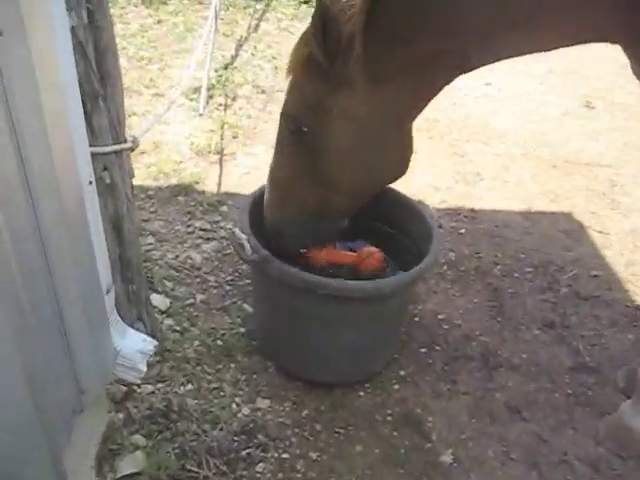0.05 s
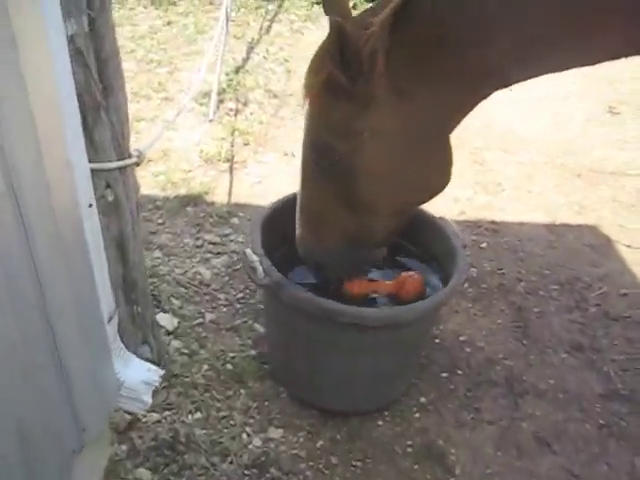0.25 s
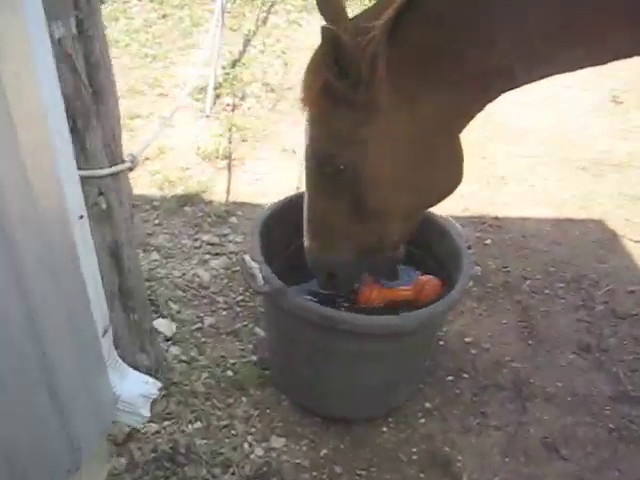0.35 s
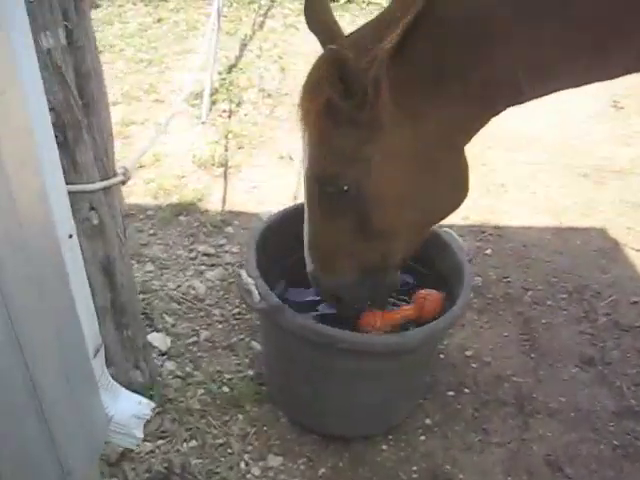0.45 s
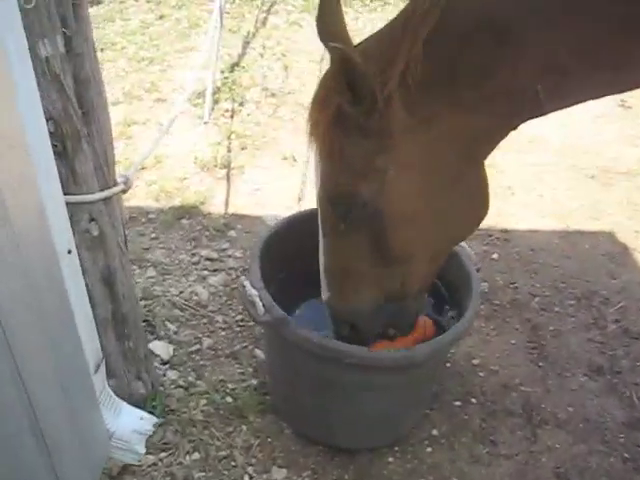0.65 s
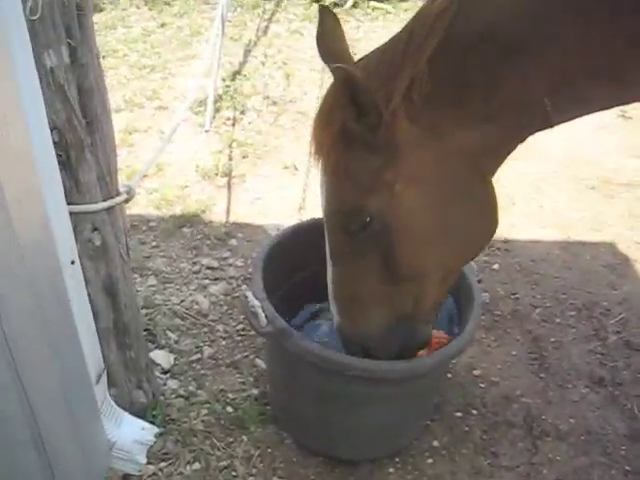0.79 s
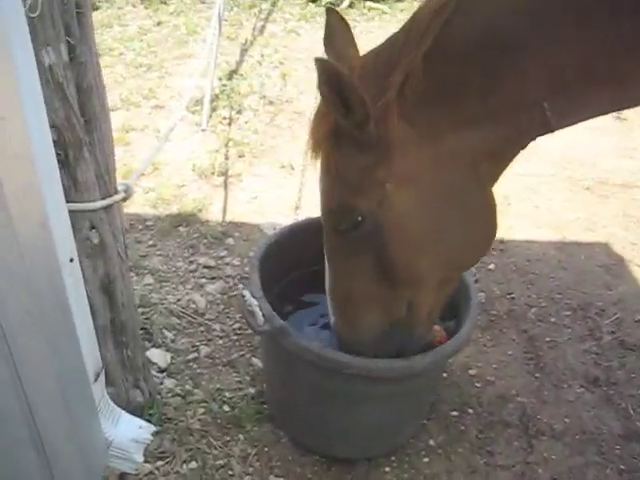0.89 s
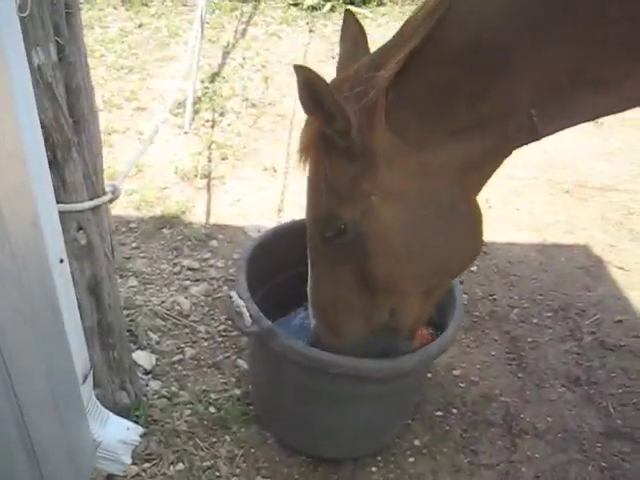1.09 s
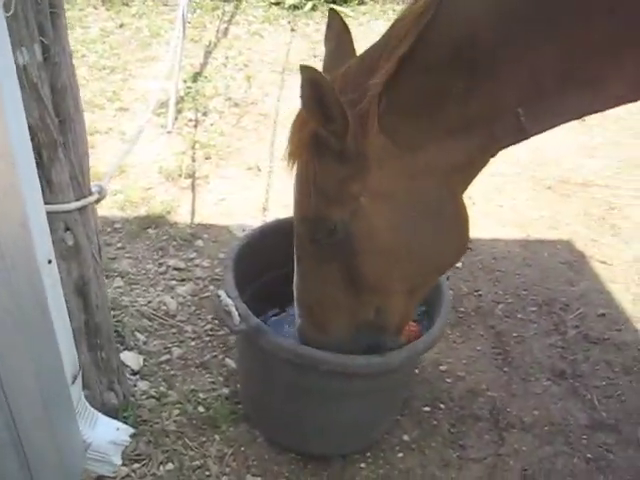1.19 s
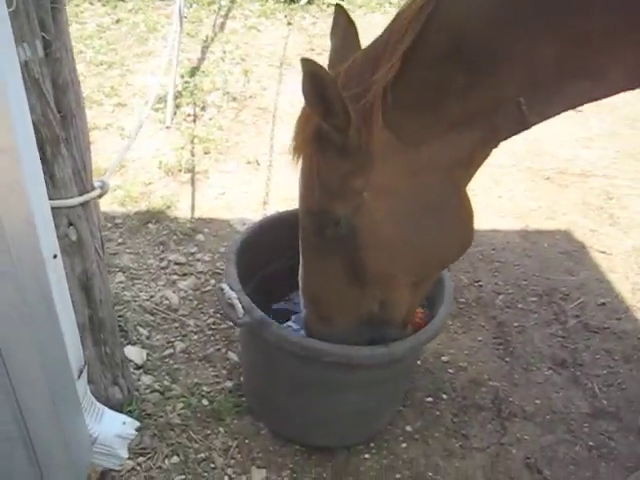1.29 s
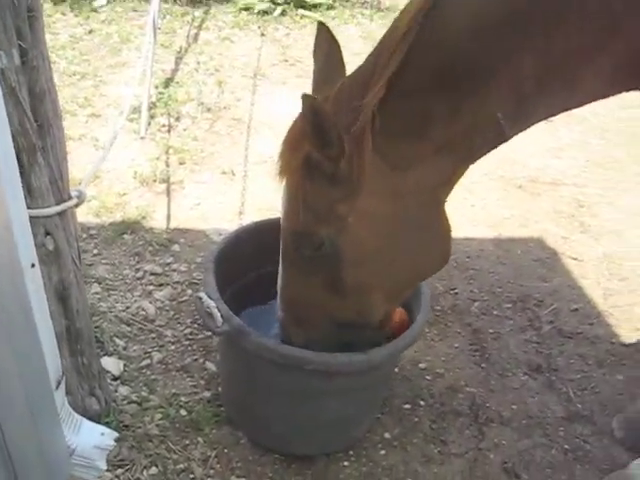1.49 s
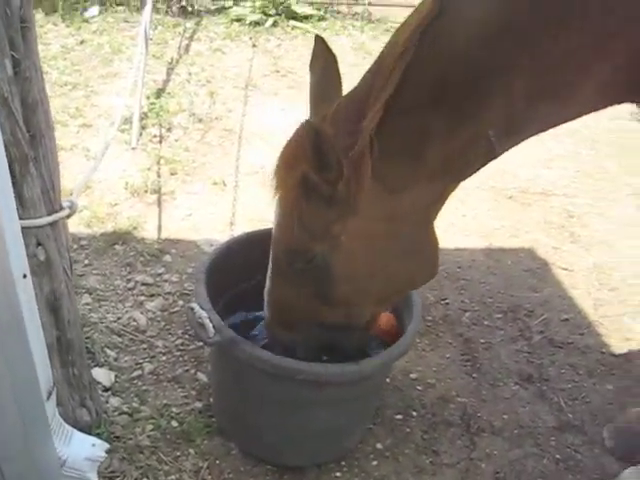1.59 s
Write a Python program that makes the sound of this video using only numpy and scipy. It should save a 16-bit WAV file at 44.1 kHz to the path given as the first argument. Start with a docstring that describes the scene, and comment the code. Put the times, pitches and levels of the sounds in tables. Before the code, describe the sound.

Water sloshes in a plastic tub as a horse's muzzle smacks wetly and bumps a toy against the wall. The biggest splash and knock come midway, then the splashing thins as wind rumbles on the microphone outdoors.

```python
"""Outdoors, heard across a quiet yard with a faint high whine: a horse at a plastic tub of water.
Its muzzle starts with small sloshes, dotted with wet smacks and bubbles, and pushes a toy that knocks
on the wall; the hollow tub rings and echoes. Just past halfway come the biggest slosh and knock.
The splashing then thins out while wind rises on the microphone, ending in one low puff."""
import sys
import numpy as np
from scipy import signal
from scipy.fft import rfft, irfft
from scipy.io import wavfile
from scipy.ndimage import uniform_filter1d

SR = 44100
rng = np.random.default_rng(int(sys.argv[2]) if len(sys.argv) > 2 else 0)


def generate_wav(sig):
    """Save sig (samples, or channels by samples) to the path in sys.argv[1] as 16-bit PCM at SR."""
    pcm = np.round(np.clip(np.atleast_2d(sig).T, -1, 1) * 32767).astype(np.int16)
    wavfile.write(sys.argv[1], SR, pcm)


N = 72765
T = np.arange(N) / SR

# pushes of the muzzle (crest time [s], rise [s], fall [s], gulp [dB], wash [dB], spray [dB])
MUZZLE_PUSHES = [(0.097, 0.01, 0.011, -56, -48, -75), (0.221, 0.015, 0.028, -48, -38, -38),
                 (0.289, 0.016, 0.022, -47, -42.5, -56), (0.341, 0.024, 0.024, -45.5, -40, -46.5),
                 (.425, .03, 0.12, -56, -50.5, -56), (.508, 0.019, 0.022, -43, -42, -44),
                 (0.592, 0.0071, 0.0085, -49, -46, -49.5), (.69, 0.02, 0.013, -74, -55.5, -48.5),
                 (.785, 0.017, 0.089, -56, -51.5, -49), (.831, 0.0057, 0.028, -39.5, -40.5, -41.5),
                 (0.869, 0.025, 0.021, -32, -38, -33.5), (0.891, 0.0086, 0.021, -41, -33, -32),
                 (.925, .01, 0.016, -52, -44, -47), (0.983, 0.011, 0.004, -48, -46, -59),
                 (1.101, 0.014, 0.023, -59, -47.5, -47), (1.133, 0.012, 0.021, -52, -40.5, -50.5),
                 (1.228, 0.0089, 0.014, -50, -47.5, -55), (1.288, 0.0064, 0.042, -54.5, -51, -54),
                 (1.383, 0.015, 0.01, -50, -40, -42)]
# spectra of a slosh's low gulp, middle wash and high spray (frequency [Hz], relative level [dB])
GULP_SPECTRUM = [(60, -25), (140, -11), (220, -7), (310, 0), (500, -1), (700, -11), (1200, -35)]
WASH_SPECTRUM = [(400, -28), (690, -13), (920, -3), (1200, -2.5), (1500, -3.5), (2000, -11), (2800, -22.5),
                 (5000, -39)]
SPRAY_SPECTRUM = [(1200, -40.5), (2300, 3.5), (3300, 5), (4600, -1.5), (6300, 1), (8500, -6), (12000, -8),
                  (16000, -29)]
# wet smacks (time [s], level [dB], centre [Hz], width [Hz], decay [s], relative snap level [dB])
LIP_SMACKS = [(.059, -31.5, 3080, 1400, 0.0096, -20), (0.2195, -29.5, 5150, 3400, .002, -6),
              (0.2662, -12.5, 6200, 6000, 0.00085, -20), (0.2671, -15.5, 8100, 10000, 0.0012, -3),
              (0.2713, -21.5, 5930, 6040, 0.0031, -20), (0.2741, -11.5, 4280, 5000, 0.0023, -2.5),
              (0.3917, -22, 2240, 3320, 0.0022, -7), (.4535, -2.5, 4000, 3200, 0.000067, -14),
              (.4547, -11.5, 6340, 3000, 0.0015, -17), (.455, -15, 1790, 1410, 0.0025, -23),
              (.459, -21.5, 3400, 2580, 0.0073, -10), (.5055, -24.5, 3420, 2600, 0.0037, -6.5),
              (0.6468, -24.5, 1900, 3380, 0.0016, -9), (.674, -23.5, 3570, 2620, 0.0048, -15),
              (0.6878, -27.5, 5860, 5700, 0.0046, -11), (0.7501, -18, 5600, 2440, 0.0055, -15),
              (.772, -31.5, 5840, 5900, 0.0037, -11), (0.8149, -16, 4550, 3940, 0.0012, -6),
              (0.8371, -19.5, 6900, 4200, 0.0062, 2), (0.8754, -19, 4930, 4600, 0.0053, 0),
              (1.145, -8, 9770, 4230, 0.0002, -13), (1.1441, -13, 4500, 3120, 0.0038, -19),
              (1.256, -32, 3920, 1210, 0.007, -18), (1.3024, -23, 3170, 2760, 0.0032, -16),
              (1.3628, -25, 5700, 3000, 0.0025, -16), (1.378, -27, 3600, 4000, 0.00099, -12),
              (1.383, -23, 2960, 3000, 0.0017, -14), (1.485, -27, 5030, 2540, 0.0019, -2.5),
              (1.524, -28, 4070, 3040, 0.0038, -16), (1.541, -33, 6000, 2460, 0.0051, -16),
              (1.6225, -28, 3360, 1780, 0.0058, -5)]
# spectrum of a smack's bright snap (frequency [Hz], relative level [dB])
SNAP_SPECTRUM = [(300, -41), (1000, -39), (5000, -3), (7500, -0.5), (9500, 1), (12000, -4), (14300, -2),
                 (15400, -6)]
# toy and muzzle hitting the tub (time [s], level [dB], centre [Hz])
WALL_KNOCKS = [(.2125, -28.5, 860), (0.2226, -30, 980), (0.2663, -24, 1360), (0.274, -23.5, 1120),
               (0.341, -49, 900), (0.391, -37, 1070), (0.456, -29, 1060), (0.4972, -28, 1060),
               (0.7605, -34, 910), (0.768, -32.5, 430), (.8675, -18, 1190), (0.877, -31.5, 415),
               (0.8826, -32, 1100), (.909, -21, 1250), (0.943, -36, 1290), (.967, -40, 1040),
               (1.1448, -20, 1380), (1.379, -35, 1110)]
# bubbles, deep gulps to small drips (time [s], pitch [Hz], level [dB], life [s], glide [octaves/s])
BUBBLE_TONES = [(0.0566, 2780, -34.5, 0.0016, 8), (0.0614, 3025, -37, 0.0036, 2),
                (.215, 364, -45, 0.036, 4), (.275, 310, -38.5, 0.009, 4), (0.3915, 1320, -23.5, 0.0017, 1),
                (0.455, 3430, -19, 0.0022, -1), (0.5002, 362, -32, 0.01, 7.5),
                (.6737, 2970, -31.5, 0.0043, 2), (0.6757, 4070, -33.5, .003, 1),
                (0.7044, 2210, -34.5, 0.0026, -25), (0.7502, 4090, -22, 0.0052, 16),
                (0.7497, 6110, -22, 0.0039, -5), (0.7596, 1110, -29, 0.0038, -10),
                (0.8142, 1840, -19.5, 0.0028, 10), (0.855, 198, -32.5, 0.012, 15),
                (.856, 356.6, -29.5, 0.029, 0), (0.8587, 1320, -22.5, 0.0037, 4),
                (0.8609, 471, -24, 0.0055, 5), (.857, 770, -32.5, 0.028, 0),
                (0.8768, 3240, -26, 0.0053, 3.5), (.882, 1180, -17, 0.004, 2), (0.896, 329, -29.5, 0.01, 7),
                (0.9075, 1420, -26.5, 0.0042, -5), (1.1306, 2680, -36, 0.0034, 28),
                (1.2177, 1900, -42, 0.008, -1), (1.258, 4070, -29.5, 0.0033, 14),
                (1.2748, 2145, -31, 0.0039, -37), (1.2823, 1440, -34, 0.0017, 0),
                (1.3024, 3450, -30, 0.0038, 5), (1.378, 1085, -29.5, 0.0032, 3),
                (1.5235, 3100, -37.5, .005, -20), (1.6222, 2910, -41, 0.0074, 9)]
# resonances of the tub's hollow and wall (frequency [Hz], relative level [dB], t60 [s])
TUB_MODES = [(240, -7, .09), (304, -1, .11), (357, -1, .11), (484, 0, .1), (550, -9, .07), (770, 1, .1),
             (925, -5, .07), (1006, -2, .08), (1150, 2, .08), (1218, 2, .09), (1328, 1, .09),
             (1400, -2, .08), (1503, -4, .07), (1700, -7, .06)]
# first reflections inside the tub (delay [s], gain [ratio])
WALL_REFLECTIONS = [(.0011, 0.13), (.0029, 0.078), (.0053, .08)]
# spectra of the yard's hiss and of wind on the microphone (frequency [Hz], relative level [dB])
YARD_SPECTRUM = [(25, -27), (60, -25), (90, -1.5), (120, 0), (170, -4), (300, -4), (650, -1), (1100, -1.5),
                 (1800, -2.5), (3500, -6), (6000, -11.5), (11000, -16.5), (14300, -12), (16000, -30)]
WIND_SPECTRUM = [(20, -7), (45, 15.5), (85, 5.5), (130, -10), (220, -7), (600, -30)]
# the gust rising at the microphone (time [s], level [dB])
GUST_LEVELS = [(0, -74), (1.2, -70), (1.42, -59), (1.46, -56), (1.51, -61.5), (1.615, -53.5), (1.65, -47)]
# the whine's two close tones (frequency [Hz], level [dB])
WHINE_TONES = [(15120, -71), (15150, -68)]

TOP_HZ = 15750


def sloshes():
    """Each push of the muzzle swells and dies: a gulp and a wash ring in the tub, with spray on top."""
    power = np.zeros((3, N))
    for crest, rise, fall, *levels_db in MUZZLE_PUSHES:
        swell = np.exp(-np.maximum((crest - T) / rise, (T - crest) / fall) ** 1.18)
        power += (amp(levels_db)[:, None] * swell) ** 2
    gulp, wash, spray = (through(unit(droplets()) * np.sqrt(layer), colour(spectrum))
                         for layer, spectrum in zip(power, (GULP_SPECTRUM, WASH_SPECTRUM, SPRAY_SPECTRUM)))
    return tub_ring(gulp, share=0.024) + tub_ring(wash, share=0.084) + spray


def droplets(per_second=3500, spread_db=3):
    """A dense stream of tiny impacts of uneven size."""
    size = amp(spread_db * np.minimum(rng.exponential(size=N), 3))
    sign = rng.choice([-1, 1], N)
    return size * sign * (rng.random(N) < per_second / SR)


def smacks():
    """Water films break at the lips: a click with a resonance and a bright snap."""
    body, snap = np.zeros(N), np.zeros(N)
    for start, db, hz, width_hz, decay_s, snap_db in LIP_SMACKS:
        click = amp(db) * burst(decay_s, rough=0.28)
        add(body, start, band(click, hz, width_hz) * np.sqrt(SR / 2 / width_hz))
        add(snap, start, amp(snap_db) * click)
    return body + through(snap, colour(SNAP_SPECTRUM))


def knocks():
    """Dull, rattling blows of toy and muzzle set the tub ringing."""
    out = np.zeros(N)
    for start, db, hz in WALL_KNOCKS:
        blow = band(burst(decay_s=0.0026, rough=0.098), hz, width_hz=0.89 * hz)
        add(out, start, amp(db) * blow / np.abs(blow).max())
    return tub_ring(out, share=0.22)


def bubbles(rise_s=0.00019, wobble_depth=0.021):
    """Each bubble rings as a gliding, wobbling tone that ends as it bursts."""
    out, t = np.zeros(N), T[:SR // 8]
    for start, hz, db, life, glide in BUBBLE_TONES:
        wobble = 1 + wobble_depth * unit(uniform_filter1d(rng.standard_normal(len(t)), size=40))
        phase = 2 * np.pi * np.cumsum(hz * wobble * 2 ** (glide * t)) / SR
        envelope = np.exp(-(t / life) ** 2) * (1 - np.exp(-t / rise_s))
        add(out, start, amp(db) * np.sin(phase) * envelope)
    return out


def fizz(db=-44, centre_hz=4300, spread_octaves=0.9, decay_cycles=4):
    """Tiny stray bubbles pop on the water all along."""
    out, t = np.zeros(N), T[:SR // 20]
    for when, pitch in rng.uniform(-1, 1, size=(60, 2)):
        hz = centre_hz * 2 ** (spread_octaves * pitch)
        ring = np.sin(2 * np.pi * hz * t) * np.exp(-hz * t / decay_cycles)
        add(out, (when + 1) / 2 * T[-1], amp(db) * ring)
    return out


def tub_ring(x, share):
    """A sound blended with the ringing it raises in the tub's hollow and wall."""
    t = T[:SR // 4]
    ring = sum(amp(db) * fade(t60) * np.cos(2 * np.pi * hz * t) for hz, db, t60 in TUB_MODES)
    ring = 4 * ring / np.abs(rfft(ring)).max()
    return (x + share * signal.oaconvolve(x, ring)[:N]) / (1 + share)


def echoes(x, tub_db=-11.5, tub_t60=0.046, yard_db=-21.5, yard_t60=0.25):
    """The microphone gets the direct sound, wall reflections, the tub's short tail and the yard's echo."""
    out = x.copy()
    for delay, gain in WALL_REFLECTIONS:
        add(out, delay, gain * x)
    for db, t60 in ((tub_db, tub_t60), (yard_db, yard_t60)):
        decay = fade(t60)
        tail = uniform_filter1d(rng.standard_normal(len(decay)), size=4) * decay
        out += amp(db) * through(x, tail)
    return out


def wind():
    """A rising gust buffets the microphone with a low rumble."""
    gust = amp(np.interp(T, *np.array(GUST_LEVELS).T))
    return gust * noise(WIND_SPECTRUM)


def puff(time_s=1.637, hz=99, db=-30, width_s=0.0062):
    """One eddy of wind bumps the microphone."""
    t = T - time_s
    return -amp(db) * np.sin(2 * np.pi * hz * t) * np.exp(-(t / width_s) ** 2)


def yard(db=-49):
    """The steady outdoor hiss of the place."""
    return amp(db) * noise(YARD_SPECTRUM)


def whine():
    """A thin, faint whine flutters as its two close tones beat."""
    return sum(amp(db) * unit(np.sin(2 * np.pi * hz * T)) for hz, db in WHINE_TONES)


def amp(db):
    """Decibels to gain."""
    return 10 ** (np.asarray(db) / 20)


def unit(x):
    """Scale to rms 1."""
    return x / np.sqrt(np.mean(x ** 2))


def fade(t60):
    """A quarter second of exponential decay, 60 dB down after t60 seconds."""
    return amp(-60 * T[:SR // 4] / t60)


def burst(decay_s, rough):
    """A click followed by a quickly dying spatter."""
    t = T[:SR // 8]
    x = rough * rng.standard_normal(len(t)) * np.exp(-t / decay_s)
    x[0] = 1
    return x


def noise(spectrum):
    """Steady noise of the given spectrum, at rms 1."""
    return unit(through(rng.standard_normal(N), colour(spectrum)))


def through(x, response):
    """Pass a sound through an impulse response scaled to unit energy."""
    return signal.oaconvolve(x, response / np.linalg.norm(response))[:N]


def colour(spectrum, size=4096):
    """Minimum-phase impulse response of a (frequency [Hz], level [dB]) curve."""
    hz, db = np.array(spectrum).T
    bin_hz = np.fft.rfftfreq(size, 1 / SR) + 1
    gain = amp(np.interp(np.log(bin_hz), np.log(hz), db))
    cepstrum = irfft(np.log(gain))
    cepstrum[1:size // 2] *= 2
    cepstrum[size // 2 + 1:] = 0
    return irfft(np.exp(rfft(cepstrum)))


def band(x, hz, width_hz):
    """Band-pass around hz, reaching no higher than TOP_HZ."""
    low = np.hypot(hz, width_hz / 2) - width_hz / 2
    high = min(low + width_hz, TOP_HZ)
    return signal.sosfilt(signal.butter(2, [low, high], "band", fs=SR, output="sos"), x)


def add(out, start, x):
    """Mix a sound in at its start time."""
    i = int(np.clip(start * SR, 0, N - 1))
    out[i:i + len(x)] += x[:N - i]


def scene(low_cut_hz=100):
    """One microphone hears the tub, which radiates little bass, across the yard."""
    water = echoes(bubbles() + smacks() + knocks() + sloshes() + fizz())
    water = signal.sosfilt(signal.butter(2, low_cut_hz, "high", fs=SR, output="sos"), water)
    return (water + yard() + whine() + wind() + puff())[None]


def record(dry):
    """The recorder cuts the treble steeply above TOP_HZ."""
    return signal.sosfilt(signal.ellip(10, .2, 80, TOP_HZ, fs=SR, output="sos"), dry)


dry = scene()
out = record(dry)
generate_wav(out)
```